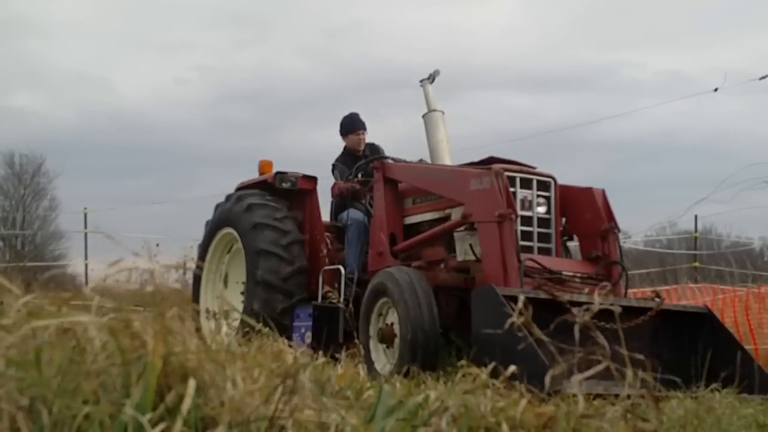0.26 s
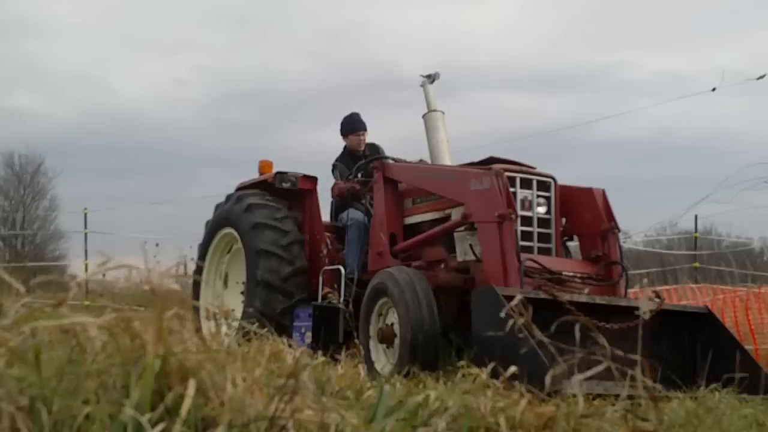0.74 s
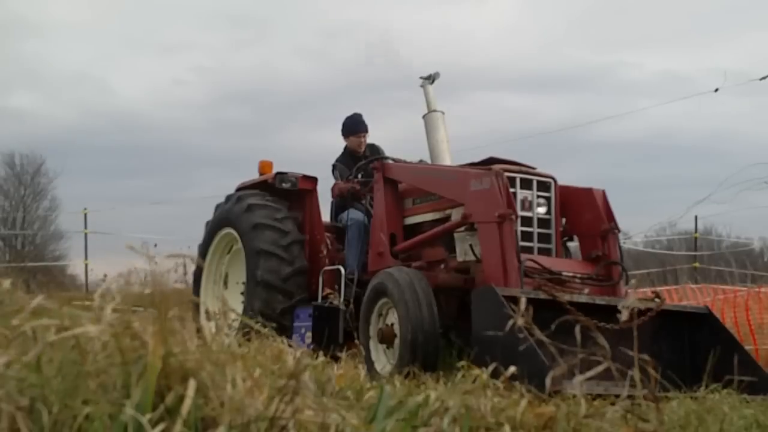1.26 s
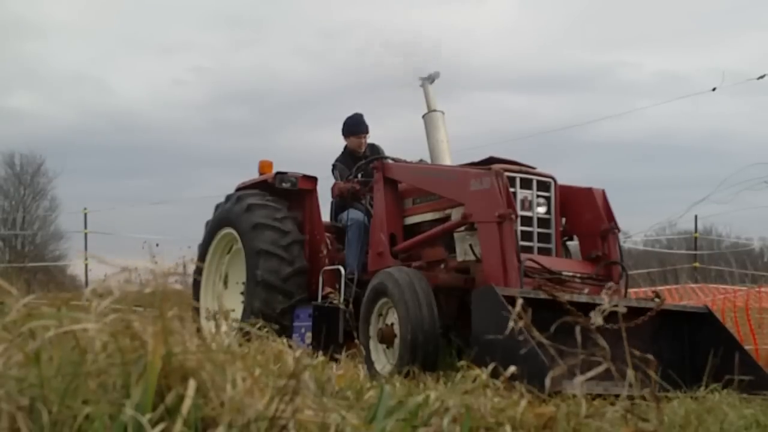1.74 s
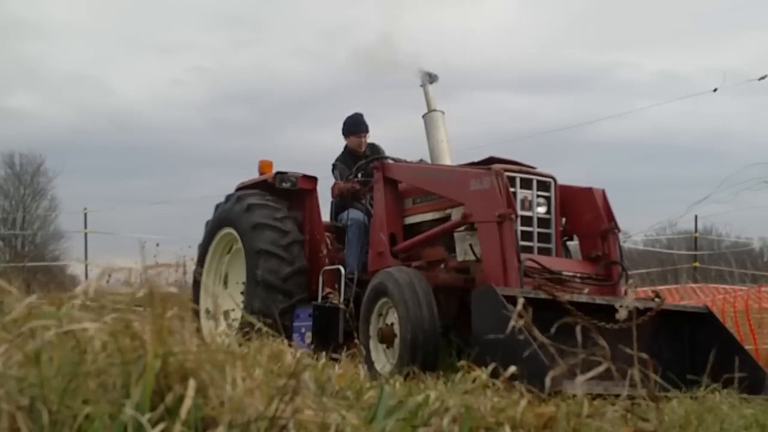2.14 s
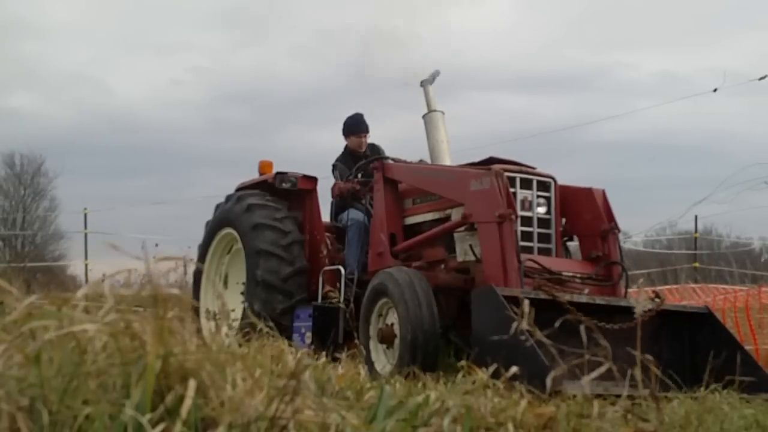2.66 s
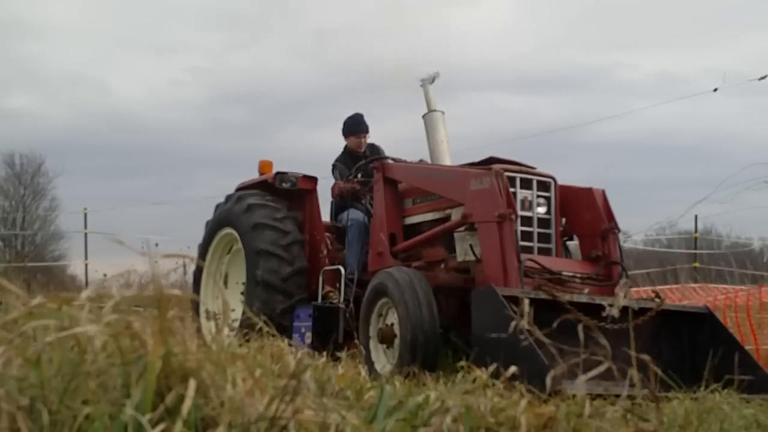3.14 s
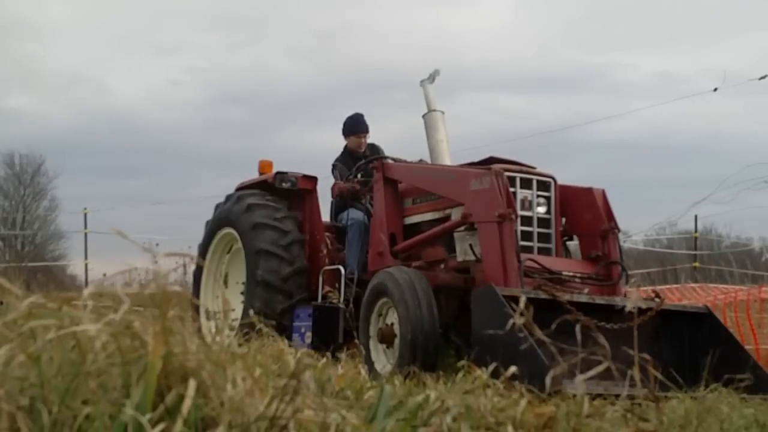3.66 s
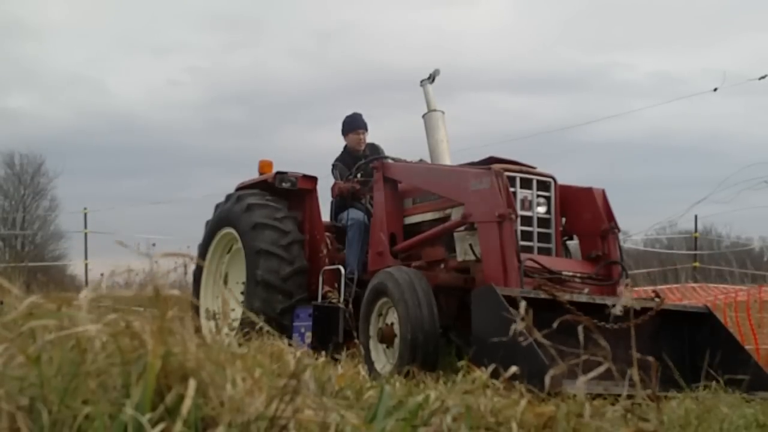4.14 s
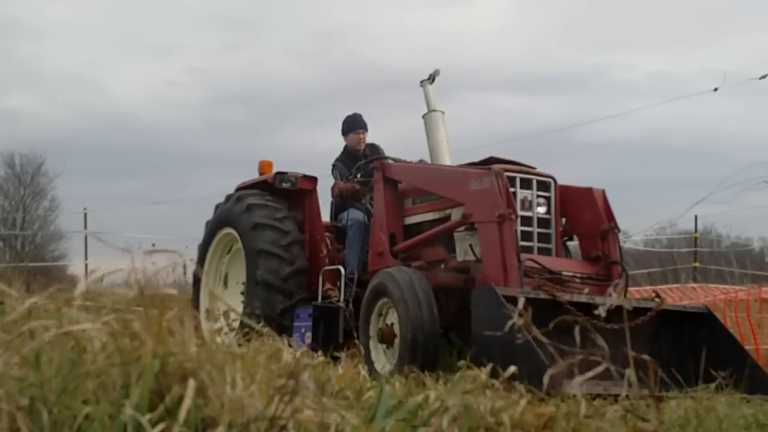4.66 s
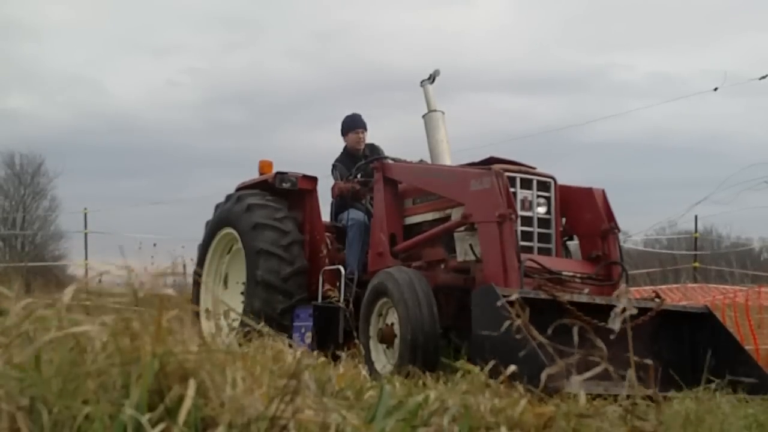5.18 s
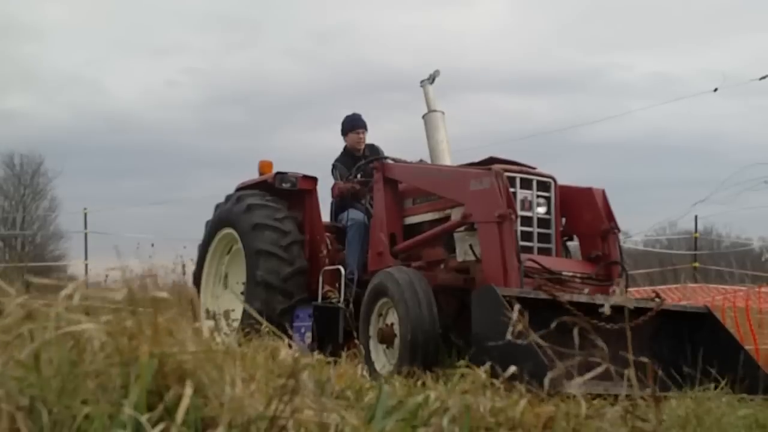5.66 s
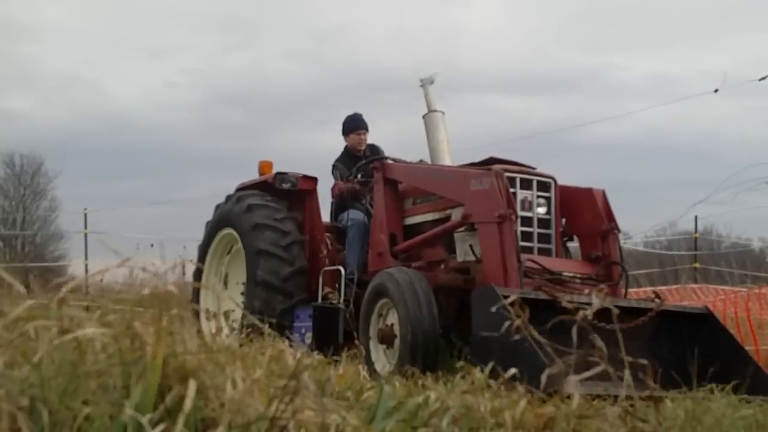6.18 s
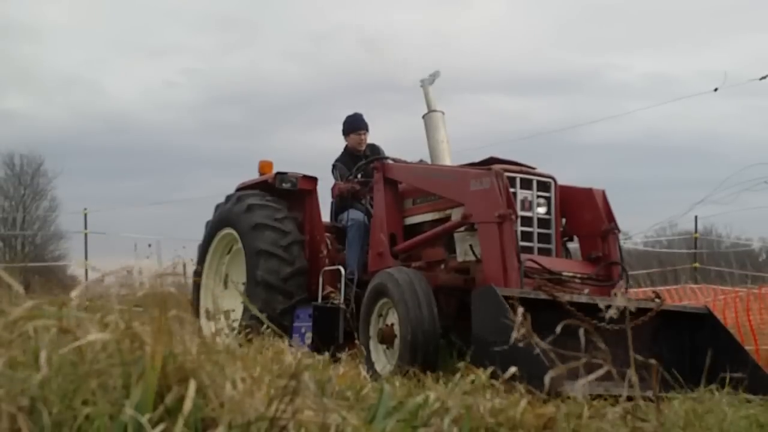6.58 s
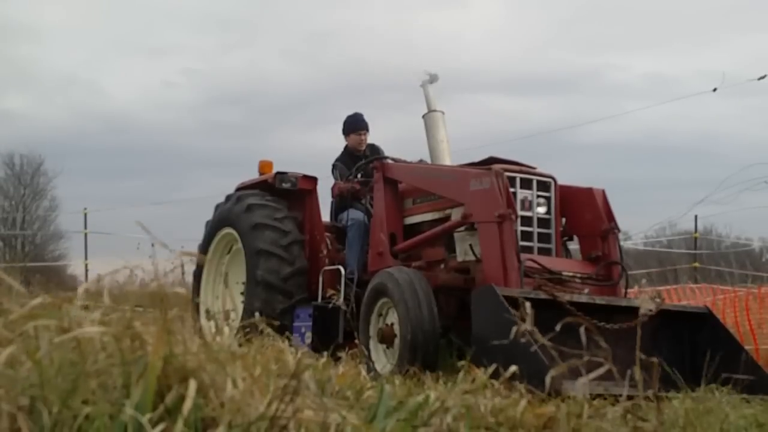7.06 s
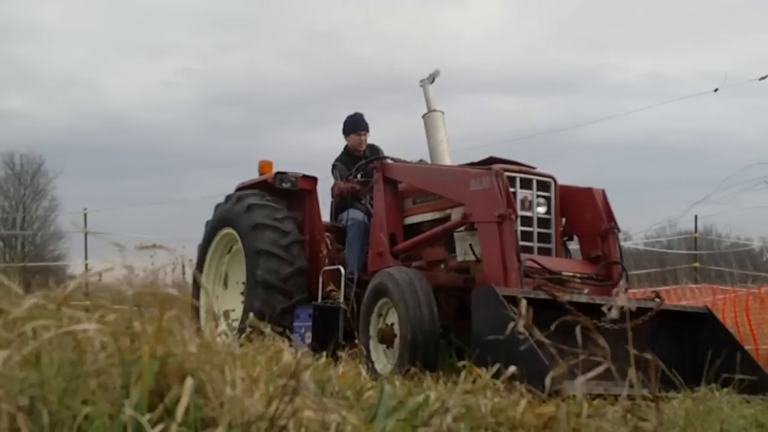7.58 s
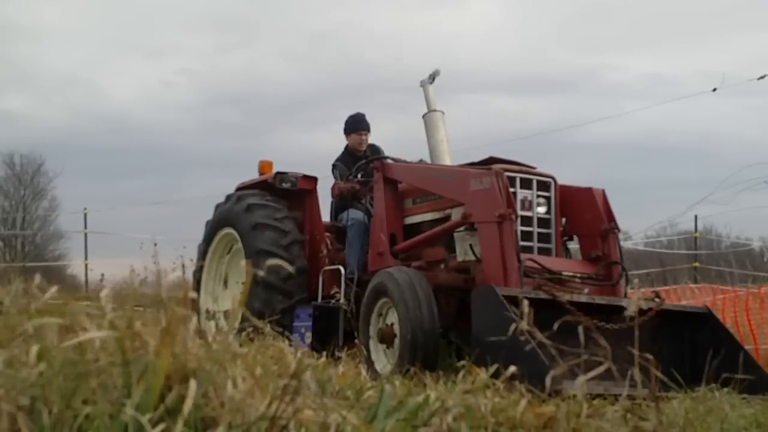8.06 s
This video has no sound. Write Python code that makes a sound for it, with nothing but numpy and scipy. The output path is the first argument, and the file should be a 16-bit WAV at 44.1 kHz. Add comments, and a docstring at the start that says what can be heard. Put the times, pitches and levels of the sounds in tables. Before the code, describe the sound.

From the start, an electric starter is cranking a cold diesel tractor in a field. Its raspy gear whine pulses with each compression, amid hollow chugs, rough barks of air and tiny squeaks. From about 0.6 seconds one cylinder catches with a low thump and metallic knock roughly every 0.4 seconds. At 3.4 seconds the cranking stops and the engine rocks to rest, with knocks fading by 4.4 seconds. Dry grass rustles briefly around 5 seconds. At 5.5 seconds the starter engages with a clack and a low growl, heaves the engine over and settles into a slightly slower rhythm, with more thumps from 6.7 seconds. It is still cranking at the end, near 8.4 seconds, without starting. Wind rumbles and bumps on the microphone throughout, hardest near 6.4 seconds, over quiet field noise and a very faint high twitter.

```python
"""A starter cranks a cold four-cylinder diesel tractor twice in a windy field.
At 0 s the pinion is already whining on the ring gear, loading at each compression and running free when
a cylinder catches with a thump, amid chugs and barks. At 3.4 s the engine rocks to rest with a few knocks.
Dry grass rustles near 5 s. At 5.5 s the pinion engages for a slower try that lasts to the end.
Wind buffets the microphone throughout, hardest near 6.4 s, over field noise and a faint high twitter."""
import sys
import numpy as np
from scipy import signal
from scipy.fft import rfft, irfft
from scipy.io import wavfile
from scipy.ndimage import uniform_filter1d

SR = 44100
rng = np.random.default_rng(int(sys.argv[2]) if len(sys.argv) > 2 else 0)


def pcm_store(signal):
    """Save signal as 16-bit PCM."""
    levels = np.round(np.clip(np.atleast_2d(signal), -1, 1) * 32767)
    wavfile.write(sys.argv[1], SR, levels.astype(np.int16).T)


N = 366912

# broad colour of the casting between its resonances: f/Hz, level/dB
CASTING_SPECTRUM = [(120, -79), (250, -50), (700, -14.5), (1300, -61), (1700, -16.5), (2100, -1.5),
                    (3000, 4), (3800, 0.5), (4200, -8.5), (6500, -17), (7500, -23.5), (9500, -16.5),
                    (12000, -53), (15000, -62)]


def amp(db):
    """Gain of a level in dB."""
    return 10 ** (np.asarray(db) / 20)


def unit_rms(x, lo_hz=0, hi_hz=SR):
    """Scales x to rms 1 within a band."""
    z, hz = rfft(x), np.fft.rfftfreq(len(x), 1 / SR)
    return x * len(x) / np.sqrt(2 * np.sum(abs(z[(hz >= lo_hz) & (hz < hi_hz)]) ** 2))


def coloured(x, points):
    """Filters x by a spectrum of points: f/Hz, level/dB."""
    f, db = np.transpose(points)
    hz = np.fft.rfftfreq(len(x), 1 / SR)
    return irfft(rfft(x) * amp(np.interp(np.log(hz + 1), np.log(f + 1), db)), len(x))


def noise(spectrum, samples=N):
    """Coloured Gaussian noise."""
    return coloured(rng.standard_normal(samples), spectrum)


def drift(samples):
    """Random wander of rms 1, smoothed over the given span."""
    return unit_rms(uniform_filter1d(uniform_filter1d(rng.standard_normal(N), samples), samples))


def add(mix, start_s, sound):
    """Mixes a sound in at start_s."""
    part = mix[round(start_s * SR):][:len(sound)]
    part += sound[:len(part)]


def thumps(rows, cycles, puff_db):
    """Short low pressure swings, each with a puff of turbulent air."""
    out, t = np.zeros(N), np.arange(-1500, 1500) / SR
    signs = rng.choice([-1., 1.], len(rows))
    for (s, db, hz), sign in zip(rows, signs):
        bell = np.exp(-(t * hz / cycles) ** 2)
        puff = unit_rms(noise([(300, 14), (1000, -9), (4000, -57)], len(t)))
        add(out, s + t[0], sign * amp(db) * bell * (np.cos(2 * np.pi * hz * t) + amp(puff_db) * puff))
    return out


def puffs(rows, rush_db, width):
    """Swells of rushing noise with a hollow resonance; width is a share of its pitch."""
    # broad airy rush: f/Hz, level/dB
    rush_spectrum = [(120, -45), (300, 4.5), (500, 1), (950, -11), (1300, -9.5), (3000, -33), (6000, -90)]
    out, t = np.zeros(N), np.arange(4000) / SR
    for s, db, hz, length_s in rows:
        air = rng.standard_normal(len(t))
        resonance = [(20, -90), (hz / (1 + width), -25), (hz, 0), (hz * (1 + width), -25), (5000, -90)]
        hollow = unit_rms(coloured(air, resonance))
        rush = amp(rush_db) * unit_rms(coloured(air, rush_spectrum))
        swell = 3 * t / length_s * np.exp(1 - 3 * t / length_s)
        add(out, s, amp(db - 10.5) * swell * (hollow + rush))
    return out


def field():
    """Steady distant field noise and microphone hiss."""
    # f/Hz, density/dB
    spectrum = [(95, -17), (150, 6), (200, -3), (248, -3.5), (286, -3), (355, -6), (473, -16), (1120, -21),
                (1360, -20), (1720, -27), (6010, -38.5), (10700, -36), (13000, -37), (14500, -90)]
    return amp(-49.5) * unit_rms(noise(spectrum), 300, 14500)


def twitter(bursts_per_s=29.97):
    """Faint high tone in rapid bursts, its pitch wandering."""
    beat = (np.arange(N) / SR - .0094) * bursts_per_s
    gate = uniform_filter1d((abs((beat + .5) % 1 - .5) < .3) * 1.0, size=60)
    hz = 10850 + 450 * drift(120)
    return amp(-60.5 + 2 * drift(60)) * gate * np.sin(2 * np.pi * np.cumsum(hz) / SR)


def grass():
    """Dry stalks brush together in short crackly swishes."""
    # t/s, level/dB, length/s
    rustles = [(4.7794, -53, 0.04), (5.196, -39, 0.05), (5.234, -41, 0.031), (5.328, -39, 0.093),
               (5.404, -49, 0.03), (5.918, -38, 0.034)]
    out = np.zeros(N)
    for s, db, length_s in rustles:
        hiss, scatter = rng.standard_normal((2, 4000))[:, :round(length_s * SR)]
        grains = unit_rms(hiss * amp(6.74 * scatter))
        add(out, s, amp(db - 12) * grains * np.hanning(len(grains)))
    return coloured(out, [(1500, -5), (5000, -2), (11000, 3), (14000, 7)])


def wind():
    """Lumpy low rumble and a faster flutter at the microphone port."""
    # t/s, rumble/dB, flutter/dB
    gusts = [(0.0, -27.5, -33.5), (0.23, -30, -38), (1.57, -22.5, -28.5), (2.2, -31.5, -34),
             (2.23, -25, -28), (2.3, -21, -35), (2.5, -27.5, -36), (2.62, -23.5, -38), (2.66, -20.5, -32),
             (2.78, -31, -35.5), (3.04, -26, -28.5), (4.61, -40, -41.5), (4.82, -31, -36),
             (5.44, -17, -38.5), (5.49, -20.5, -26), (5.98, -25.5, -32), (6.21, -16, -21),
             (6.33, -24.5, -24.5), (6.439, -6, -17), (6.49, -17.5, -32), (6.67, -21, -24),
             (6.79, -23.5, -43), (6.84, -19, -22), (7.81, -28.5, -35), (8.04, -25, -28), (8.32, -45, -31.5)]
    # both: f/Hz, density/dB
    rumble_spectrum = [(5, -6.5), (15, -1), (35, -13), (70, -15), (110, -34), (300, -73.5)]
    flutter_spectrum = [(40, -1.5), (70, -0.5), (150, -6), (230, -11.5), (400, -21), (800, -35),
                        (2500, -84)]
    s, rumble_db, flutter_db = np.transpose(gusts)
    t, lumps_db = np.arange(N) / SR, 2.5 * drift(1800)
    rumble = unit_rms(noise(rumble_spectrum) * amp(lumps_db))
    flutter = unit_rms(noise(flutter_spectrum) * amp(0.96 * lumps_db + 2 * drift(600)))
    return rumble * amp(np.interp(t, s, rumble_db)) + flutter * amp(np.interp(t, s, flutter_db))


def buffets():
    """Eddies strike the microphone; one gust cracks on it."""
    # t/s, level/dB, f/Hz
    eddies = [(1.214, -16.5, 93.4), (1.473, -11.5, 76.3), (1.633, -24, 65.3), (3.106, -17, 60.15),
              (3.391, -25, 54.5), (4.87, -20.5, 90), (5.019, -16.5, 70), (5.302, -7.5, 149),
              (5.378, -19, 75), (5.503, -10, 110.3), (5.596, -11.5, 203.7), (5.737, -38, 76.8),
              (5.887, -25, 96.6), (6.148, -9.5, 122.8), (6.196, -3.5, 107.2), (6.273, -17, 74.1),
              (6.43, -2, 128.2), (6.467, -14, 124), (6.513, -6.5, 187.3), (6.554, -12, 90.2),
              (6.63, -8, 74.95), (6.838, -15, 96.3), (6.966, -13.5, 84.27), (7.21, -12.5, 113.3),
              (7.268, -14.5, 142.2)]
    # t/s, level/dB, f/Hz, length/s
    gust_cracks = [(6.42, -23, 807, 0.03)]
    return thumps(eddies, cycles=0.43, puff_db=-27) + puffs(gust_cracks, rush_db=8.5, width=3.1)


def housing(decay_scale=1.0):
    """Ring of the bell housing and panels after one tap."""
    # f/Hz, width/Hz, level/dB
    modes = [(334, 74, 7), (516, 54, -5.5), (681, 51, 1), (821, 6.9, 3.5), (978, 150, -3.5), (1151, 39, -5),
             (1600, 13, -2.5), (1672, 19, 8), (1760, 32, 4.5), (1840, 107, 6.5), (2062, 48, 1),
             (2402, 77, 3.5), (2603, 25, 4.5), (2920, 14, -2), (2992, 31, 1), (3026, 21, 10),
             (3250, 24, 6.5), (3417, 96, -0.5), (3740, 57, -2), (4610, 29, -6.5), (4910, 140, -14),
             (5380, 27, -7.5), (5990, 530, -13.5), (6350, 90, -14.5)]
    t = np.arange(3000) / SR
    return sum(amp(db) * width_hz * np.exp(-np.pi * width_hz * t / decay_scale)
               * np.sin(2 * np.pi * hz * t) for hz, width_hz, db in modes)


def knocks():
    """Metal cracks, rattles and pings at firings, as the engine rocks to rest and as the pinion engages."""
    # t/s, level/dB, brightest f/Hz, treble/dB, t60/s
    blows = [(1.0167, -27, 2383, -11, 0.15), (1.42, -29, 2396, -20, 0.086), (1.8231, -38, 2520, -6, 0.13),
             (2.2196, -31, 1602, -28, 0.19), (2.6228, -30, 2523, -22, 0.18), (3.036, -26, 2582, -30, 0.059),
             (3.384, -38, 1570, -27, 0.19), (3.4193, -26, 1500, -15, 0.14), (3.451, -31.5, 1550, -27, 0.14),
             (3.5526, -36, 2180, -30, 0.25), (3.6892, -36, 1500, -24, 0.17), (3.808, -36, 2300, -33, 0.16),
             (3.863, -41.5, 2150, 2, 0.24), (3.905, -47, 1800, -14, 0.17), (4.067, -47, 1530, -17, 0.15),
             (4.344, -44, 2290, -22, 0.13), (5.532, -38, 2387, -27, 0.15), (5.5442, -31, 1915, -15, 0.08),
             (5.55, -24, 1550, -8, 0.12)]
    crack_spectrum = [(600, -25), (1200, 8), (4500, -9), (7000, -18), (12000, -38)]
    out, t = np.zeros(N), np.arange(9000) / SR
    for s, db, hz, treble_db, t60_s in blows:
        blow = rng.standard_normal(len(t)) * amp(-60 * t / t60_s) * np.minimum(t / 0.00072, 1)
        crack = coloured(blow * np.exp(-t / 0.0017), crack_spectrum)
        crack = amp(0.5 * treble_db - 4.5) * crack / abs(crack).max()
        ping = amp(-16.5 - 60 * t / (0.4 * t60_s)) * np.sin(2 * np.pi * hz * t)
        ping *= np.minimum(t / 0.0026, 1)
        ring = signal.oaconvolve(blow, housing(decay_scale=.4))[:len(t)]
        rattle = 1.2 * unit_rms(ring) + unit_rms(coloured(blow, CASTING_SPECTRUM))
        rattle = coloured(rattle, [(200, -10), (hz * 0.6, -5), (hz * 0.88, -5), (hz, -2), (hz * 1.14, -8),
                                   (hz * 1.4, -13), (4400, -10), (5500, treble_db + 6)])
        add(out, s, amp(db) * (rattle / abs(rattle).max() + crack + ping))
    return out


def firings():
    """One cylinder catches and thumps through the pipe."""
    # t/s, level/dB, pipe f/Hz
    catches = [(0.588, -14.5, 68.4), (1.027, -14, 50), (1.437, -14, 71.1), (1.842, -14, 77.4),
               (2.239, -19, 56.4), (2.643, -14, 55), (3.049, -41, 325.6), (6.69, -25, 216.4),
               (7.151, -10.5, 85.9), (7.604, -14, 70.7), (8.05, -18, 81.2)]
    return thumps(catches, cycles=0.44, puff_db=-22)


def barks():
    """Rough barks of air at the hardest compressions."""
    # t/s, level/dB, f/Hz, length/s
    compressions = [(0.92, -28, 897, 0.033), (1.335, -28.5, 912, 0.041), (1.74, -35, 901, 0.026),
                    (2.14, -30.5, 888, 0.029), (2.54, -25, 1001, 0.031), (2.945, -28, 896, 0.027),
                    (3.238, -33, 1010, 0.04), (6.56, -31, 891, 0.054), (7.04, -27, 905, .03),
                    (7.495, -26.5, 795, 0.035), (7.94, -33, 905, 0.029)]
    return puffs(compressions, rush_db=6, width=0.4)


def strokes():
    """Gear strokes with length/s appended; each lasts until the next."""
    # t/s, kind, load/dB, tooth rate at take-up/Hz, at let-go/Hz
    # the kind in the first and last rows is a partial cranking stroke, cut short by the start or end
    rows = [(0, "engage", -27.5, 341.4, 440), (0.031, "slow", -27, 418.2, 320),
            (0.189, "slow", -28, 409.2, 314), (0.345, "slow", -27.5, 418.3, 302),
            (0.5, "catch", -33.5, 329.3, 310), (0.578, "kick", -29.5, 591.4, 670),
            (0.636, "first", -26.5, 642.7, 484), (0.73, "second", -29.5, 581, 425),
            (0.845, "third", -29.5, 522, 416), (1.015, "catch", -35, 608, 510),
            (1.082, "first", -27.5, 702, 565), (1.172, "second", -28.5, 638, 483),
            (1.275, "third", -29, 572.5, 390), (1.42, "catch", -33.5, 598, 590),
            (1.494, "first", -28, 710.3, 580), (1.581, "second", -29.5, 668.4, 450),
            (1.676, "third", -29, 588.3, 455), (1.823, "catch", -35, 583.8, 690),
            (1.898, "first", -28, 685.5, 583), (1.979, "second", -29, 624, 530),
            (2.073, "third", -28.5, 592.5, 465), (2.2212, "catch", -36, 620, 550),
            (2.287, "first", -27, 699, 570), (2.377, "second", -28, 633.7, 500),
            (2.476, "third", -28, 591, 480), (2.6243, "catch", -35.5, 589.5, 596),
            (2.691, "first", -27.5, 701.5, 500), (2.786, "second", -29, 658, 445),
            (2.888, "third", -29.5, 582.4, 400), (3.037, "catch", -38, 530, 640),
            (3.095, "first", -27.5, 684, 533), (3.197, "last", -30, 604, 510),
            (3.315, "coast", -56, 440, 450), (3.382, "rest", -79, 400, 190), (5.534, "spin", -42, 205, 220),
            (5.645, "spin", -40.5, 247.5, 245), (5.7262, "slow", -31.5, 295, 318),
            (5.9, "heave", -25, 358.2, 337), (6.175, "kick", -30.5, 518, 580),
            (6.243, "first", -27, 564.5, 530), (6.357, "second", -29.5, 517, 400),
            (6.476, "third", -29, 481.5, 400), (6.681, "kick", -30.5, 575, 556),
            (6.745, "first", -28.5, 619, 520), (6.832, "second", -29.5, 571, 394),
            (6.96, "third", -30, 521, 390), (7.147, "kick", -29, 574.5, 640),
            (7.207, "first", -27, 610.8, 530), (7.298, "second", -29, 586, 414),
            (7.418, "third", -28.5, 522.5, 424), (7.598, "kick", -30, 593, 610),
            (7.658, "first", -27.5, 636.6, 525), (7.752, "second", -28.5, 586.7, 477),
            (7.865, "third", -28, 530, 396), (8.05, "kick", -28.5, 600, 610),
            (8.109, "first", -27, 629, 544), (8.205, "second", -28, 574, 420),
            (8.305, "engage", -34.5, 531.6, 470)]
    ends_s = [row[0] for row in rows[1:]] + [N / SR + .03]
    return [(*row, end_s - row[0]) for row, end_s in zip(rows, ends_s)]


def chugs(chug_s=0.039, spread_db=1.5, pitch_spread=0.03):
    """Short, low, hollow chugs on most strokes, never twice alike."""
    # per stroke kind: onset/stroke length, level/dB, f/Hz
    chugs_by_kind = {"kick": [(.1, -31, 320)], "catch": [(.1, -31.5, 345)], "first": [(.02, -38, 618.1),
                     (.42, -29, 296)], "second": [(.38, -30, 328)], "third": [(.4, -31, 455)],
                     "slow": [(.7, -27, 373), (.72, -26, 707)], "heave": [(.5, -19.5, 630)], "spin": [],
                     "coast": [], "last": [(.36, -24.5, 345)], "engage": [(.7, -33, 400)],
                     "rest": [(.005, -24, 299), (.066, -28.5, 324), (.096, -38, 450), (.128, -33.5, 330)]}
    rows = []
    for s, kind, *_, length_s in strokes():
        for onset, db, hz in chugs_by_kind[kind]:
            db += spread_db * rng.standard_normal()
            hz *= 1 + pitch_spread * rng.standard_normal()
            rows.append((s + onset * length_s, db, hz, chug_s))
    return puffs(rows, rush_db=-2.5, width=0.23)


def churn_and_brushes(load_db):
    """Oil and valves churn, brushes hiss on the commutator; both follow the load only in part."""
    # both: f/Hz, level/dB
    churn_spectrum = [(100, -58), (220, -2.5), (350, -2.5), (650, -2.5), (1000, -17), (2000, -8.5),
                      (5000, -35.5), (9000, -86)]
    brush_spectrum = [(4000, 0.5), (7000, 3), (9200, 2.5), (11500, -7), (13000, -36), (15000, -50)]
    running = uniform_filter1d((load_db > -68) * 1.0, size=900)
    churn = unit_rms(noise(churn_spectrum)) * amp(-36.5 + 0.08 * (load_db + 15.5) + 2 * drift(500))
    hiss = unit_rms(noise(brush_spectrum)) * amp(-56 + 0.63 * (load_db + 35.5) + 2 * drift(150))
    return running * (churn + hiss)


def squeaks():
    """A dry bearing chirps briefly, a little rough."""
    # t/s, level/dB, f/Hz, length/s
    chirps = [(1.231, -41, 2600, 0.016), (1.432, -30.5, 2580, .018), (2.432, -30, 2632, 0.025),
              (2.841, -30, 2605, .022), (3.034, -31, 2558, 0.025), (6.67, -35, 2584, 0.013),
              (7.248, -43, 2620, .015), (7.595, -23, 2542, 0.016)]
    out, t = np.zeros(N), np.arange(2000) / SR
    for s, db, hz, length_s in chirps:
        waver = 1 + .012 * unit_rms(uniform_filter1d(rng.standard_normal(len(t)), size=60))
        swell = np.sin(np.pi * np.minimum(t / length_s, 1) ** .6) ** 2
        add(out, s, amp(db) * swell * np.sin(2 * np.pi * np.cumsum(hz * waver) / SR))
    return out


def growl(tooth_hz, gain):
    """Slow teeth shake the frame at low multiples of their rate, each swelling on its own."""
    # multiple, level/dB
    harmonics = [(1, -7), (2, -2), (3, -8)]
    teeth = np.cumsum(tooth_hz * (1 + .01 * drift(300))) / SR
    return gain * sum(amp(db + 2.3 * drift(700)) * np.cos(2 * np.pi * k * teeth) for k, db in harmonics)


def cranking(drop_s=.024, slack_db_per_s=-36, retry_s=6.2):
    """Control curves of the pinion: each stroke loads it up to a knee, then it lets go."""
    # per stroke kind: knee/stroke length, load offset/dB at take-up, at knee, once let go
    load_shapes = {"catch": (0.17, -1, -0.5, -7.5), "kick": (0.39, 4, -3, -10),
                   "first": (.54, -1.5, 0, -11), "second": (.6, -2, 0, -11), "third": (.5, -2, 0, -6),
                   "coast": (.5, -6, -13, -7), "slow": (0.87, -4.5, -1.8, -6), "last": (0.46, -3, -1, -9),
                   "heave": (0.6, -11, -4.5, -12), "spin": (0.906, .44, -0.81, -1.6),
                   "engage": (5, -0.5, -4.5, -8), "rest": (.05, -.1, -.1, -.1)}
    # per stroke kind: mid-way arch of the tooth rate/mean rate
    arches = {"catch": -.07, "kick": -.05, "first": .0, "second": .03, "third": .06, "coast": .08, "slow":
              .19, "last": 0, "heave": .19, "spin": .01, "engage": -.14, "rest": 0}
    # per stroke kind: tonal amplitude of the mesh, .67 = pure tone
    tones = {"catch": .32, "kick": .39, "first": .43, "second": .45, "third": .45, "slow": .39, "last": .4,
             "heave": .4, "engage": .32, "spin": .33, "coast": .2, "rest": 0}
    # per slow stroke kind: level/dB
    growls_db = {"spin": -36, "slow": -39.5, "heave": -46}
    load_db, tooth_hz, tone, growl_gain, dull_db = np.zeros((5, N))
    for s, kind, stroke_db, take_up_hz, let_go_hz, length_s in strokes():
        (knee, *offsets_db), arch = load_shapes[kind], arches[kind]
        knee_s = length_s * np.clip(knee * (.94 if s > retry_s else 1), .02, .98)  # earlier on the retry
        part = slice(round(s * SR), min(round((s + length_s) * SR), N))
        t = np.arange(part.start, part.stop) / SR - s
        load_db[part] = stroke_db + np.interp(t, [0, knee_s, knee_s + drop_s], offsets_db)
        load_db[part] += slack_db_per_s * np.maximum(t - knee_s - drop_s, 0)
        progress = np.minimum(t / min(knee_s + .022, length_s), 1)  # 0 at take-up, 1 at let-go
        meshed = progress < 1
        arch_hz = arch * (take_up_hz + let_go_hz) / 2 * abs(4 * progress * (1 - progress)) ** .75
        tooth_hz[part] = take_up_hz + (let_go_hz - take_up_hz) * progress + arch_hz
        purity = 1 - 3 * abs(arch) * (1 - 2 * progress) ** 2  # highest mid-arch
        tone[part] = tones[kind] * meshed * (1 - .35 * progress ** 2) * purity
        growl_gain[part] = amp(growls_db.get(kind, -90)) * meshed
        dull_db[part] = -2 * progress * (kind != "spin")  # treble fades towards let-go
    load_db = np.r_[load_db[130:], load_db[-130:]]  # teeth touch 3 ms before the housing rings up
    return (uniform_filter1d(load_db, 90), uniform_filter1d(tooth_hz, 200), uniform_filter1d(tone, 600),
            uniform_filter1d(growl_gain, 600), uniform_filter1d(dull_db, 200))


def gears(load_db, tooth_hz, tone, dull_db, wear_db=3, pinion_teeth=9):
    """The loaded mesh sings at multiples of the tooth rate, uneven with wear and run-out, over a rasp."""
    teeth = np.cumsum(tooth_hz * (1 + .04 * (.67 - tone) * drift(120))) / SR
    sway = amp(6 * np.tanh(drift(300)))
    whine = sum(np.roll(sway, 9001 * k) * np.cos(2 * np.pi * (k * teeth + rng.random()))
                / (1 + (k / 7) ** 2) for k in range(1, 13))
    wear = amp(wear_db * rng.standard_normal(N)[teeth.astype(int)])  # one gain per tooth contact
    run_out = 1 + .2 * np.cos(2 * np.pi * teeth / pinion_teeth)
    rasp = np.sqrt(.45 - tone ** 2) * rng.standard_normal(N)
    load = amp(load_db)
    drive = (tone * unit_rms(whine * wear) + rasp) * run_out * load
    ring = unit_rms(signal.oaconvolve(drive, housing())[:N], 1400, 4000)
    body = amp(1) * ring + unit_rms(coloured(drive, CASTING_SPECTRUM), 1400, 4000)
    treble = coloured(body, [(1900, -40), (2300, 0)])
    body += (amp(dull_db) - 1) * treble
    return unit_rms(body, 1480, 4100) * np.sqrt(np.mean(load ** 2))


def scene():
    """Mono mix of the tractor, the sounds near the microphone and the field."""
    load_db, tooth_hz, tone, growl_gain, dull_db = cranking()
    starter = gears(load_db, tooth_hz, tone, dull_db) + growl(tooth_hz, growl_gain) + squeaks()
    engine = churn_and_brushes(load_db) + chugs() + barks() + knocks()
    near = wind() + buffets() + grass() + twitter()
    return (starter + engine + firings() + near + field())[None]


def record(dry):
    """Microphone: soft overload, treble roll-off, narrow dip, band limit."""
    # f/Hz, gain/dB
    roll_off = [(11000, -1), (12200, 0.5), (13000, -25), (14300, -13)]
    notch_hz, edge_hz = 7900, 14300
    soft = .9 * np.tanh(dry[0] / .9)
    dipped = signal.lfilter(*signal.iirnotch(notch_hz, Q=16, fs=SR), coloured(soft, roll_off))
    band_limit = signal.firwin(511, edge_hz, window=("kaiser", 9), fs=SR)
    return signal.oaconvolve(dipped, band_limit, "same")[None]


dry = scene()
out = record(dry)
pcm_store(out)
```